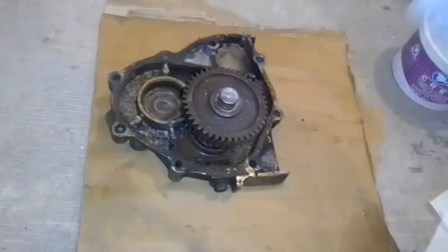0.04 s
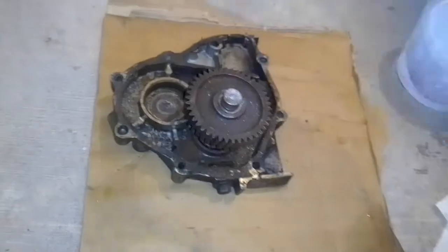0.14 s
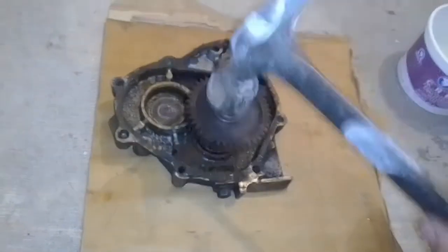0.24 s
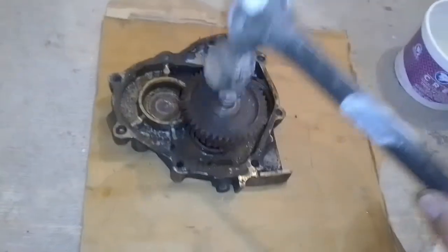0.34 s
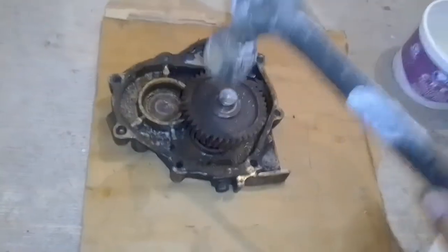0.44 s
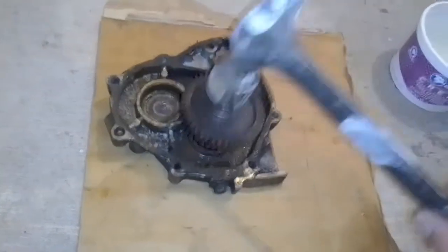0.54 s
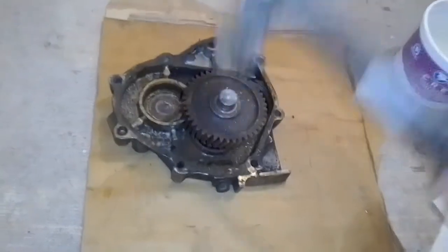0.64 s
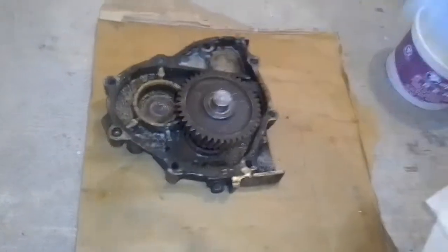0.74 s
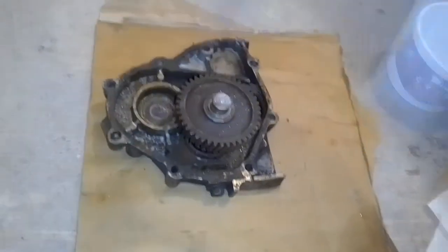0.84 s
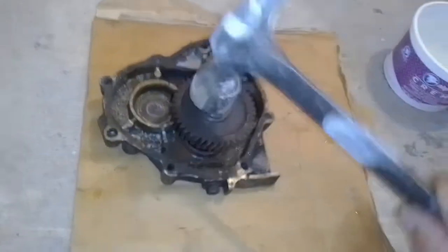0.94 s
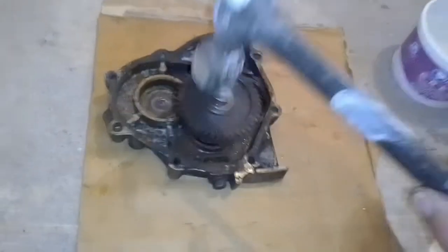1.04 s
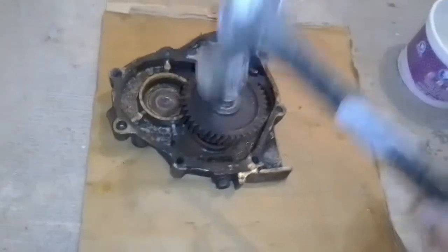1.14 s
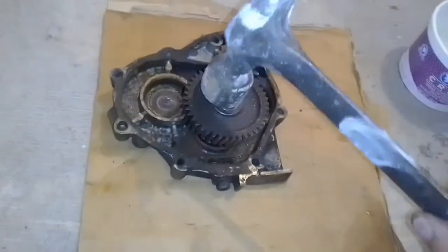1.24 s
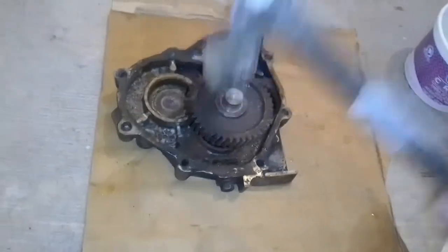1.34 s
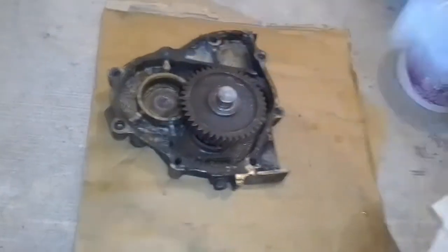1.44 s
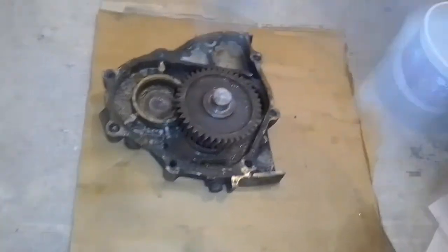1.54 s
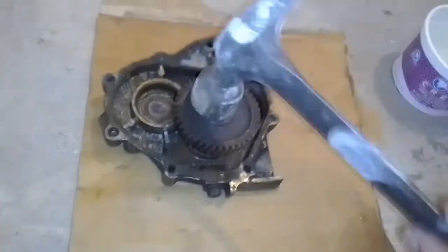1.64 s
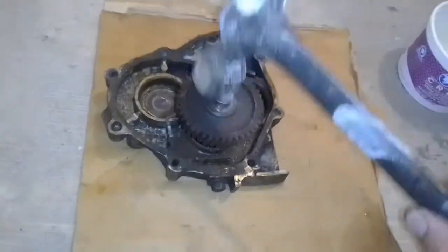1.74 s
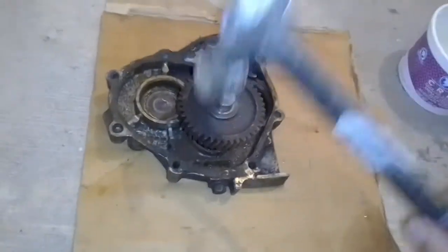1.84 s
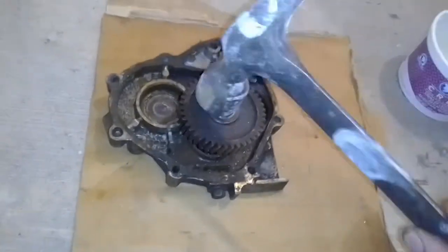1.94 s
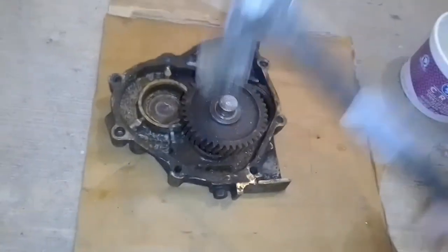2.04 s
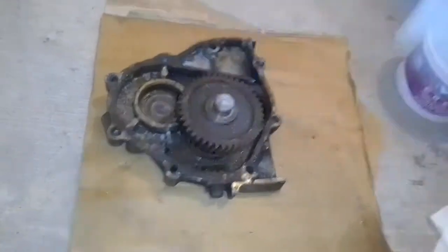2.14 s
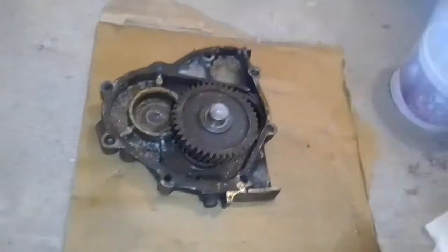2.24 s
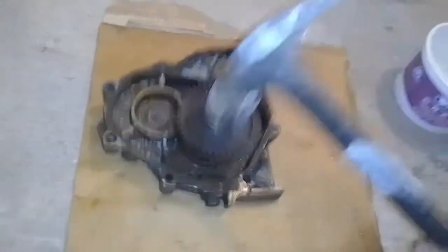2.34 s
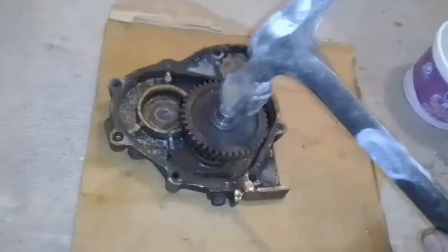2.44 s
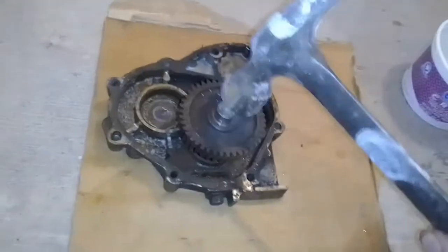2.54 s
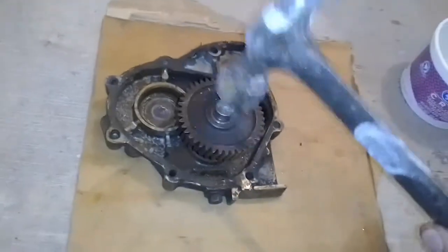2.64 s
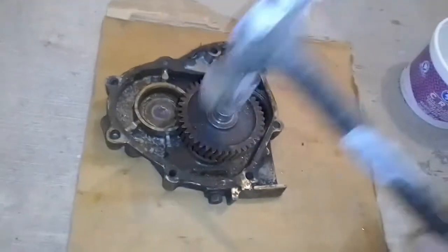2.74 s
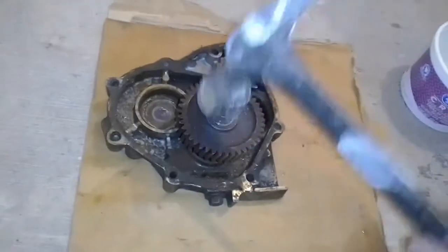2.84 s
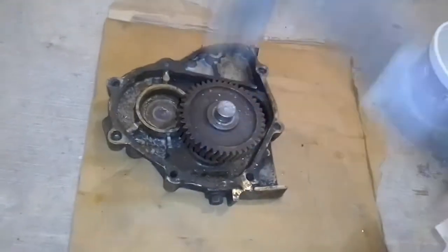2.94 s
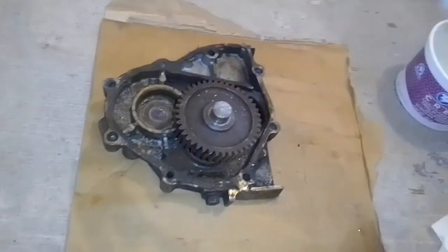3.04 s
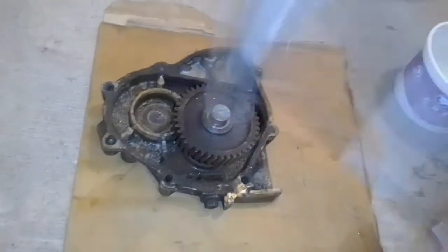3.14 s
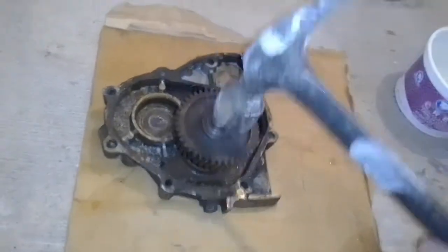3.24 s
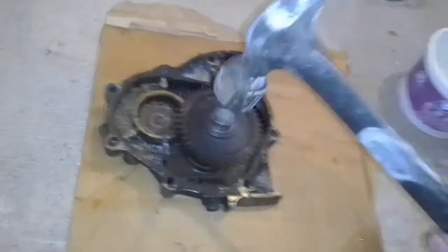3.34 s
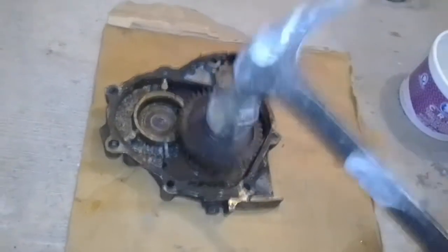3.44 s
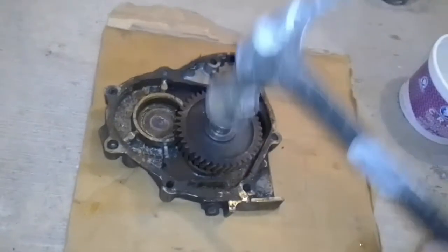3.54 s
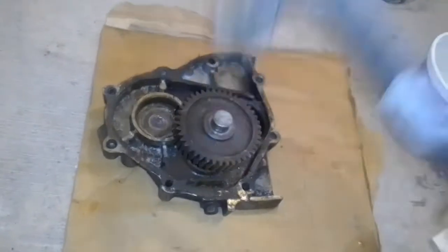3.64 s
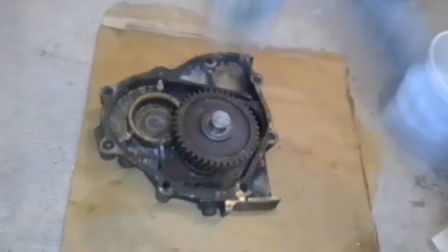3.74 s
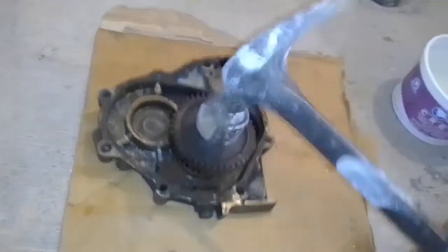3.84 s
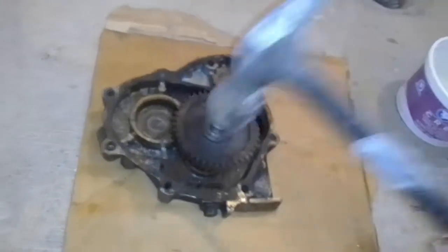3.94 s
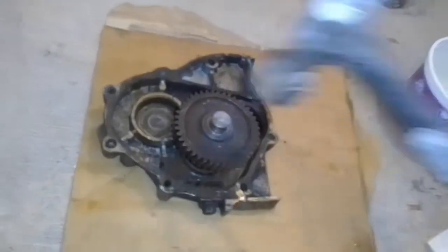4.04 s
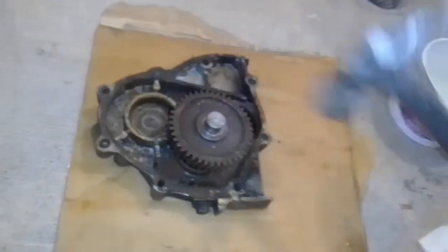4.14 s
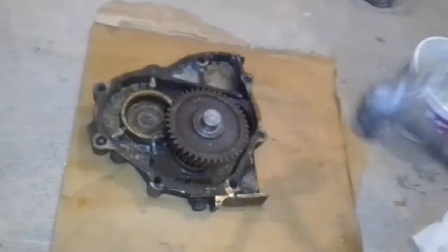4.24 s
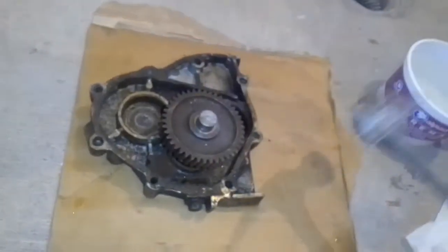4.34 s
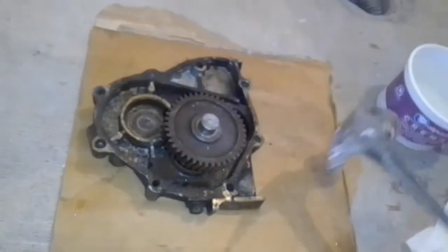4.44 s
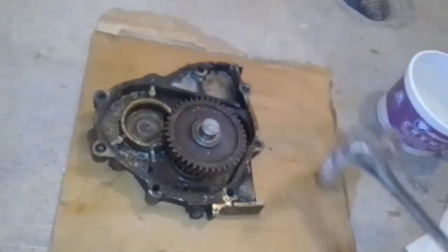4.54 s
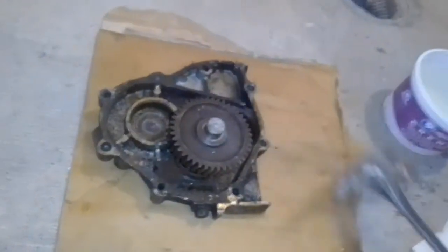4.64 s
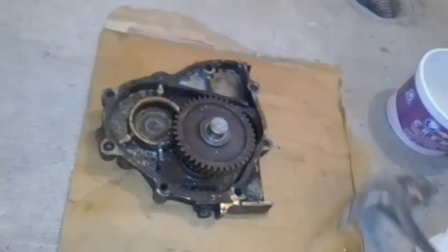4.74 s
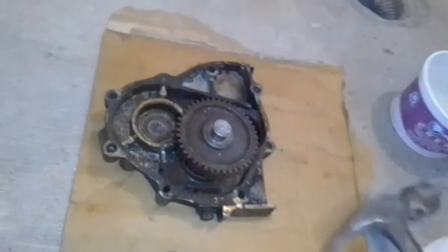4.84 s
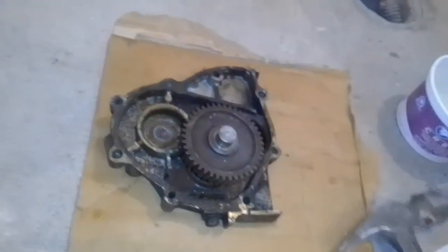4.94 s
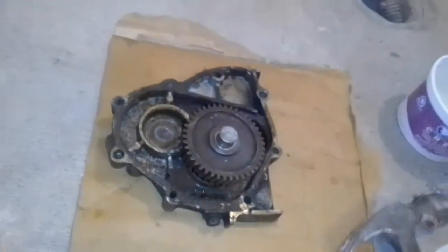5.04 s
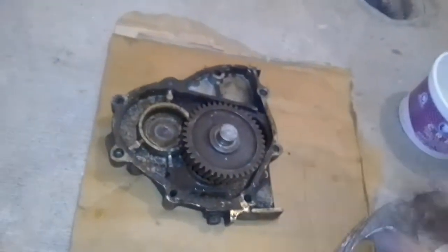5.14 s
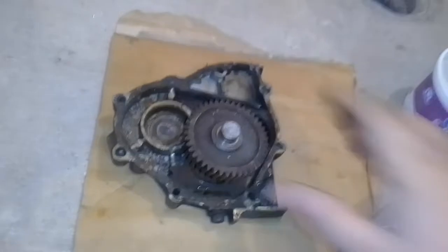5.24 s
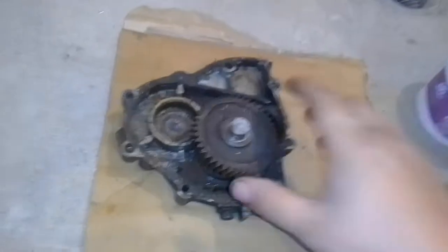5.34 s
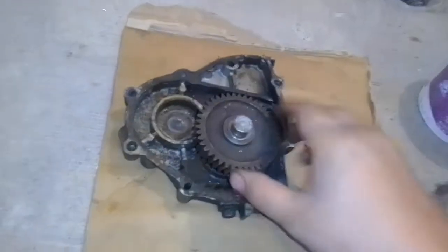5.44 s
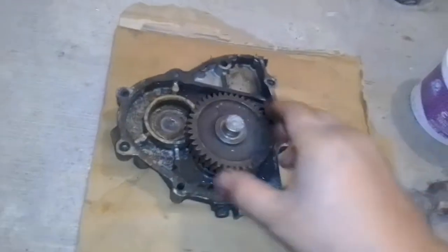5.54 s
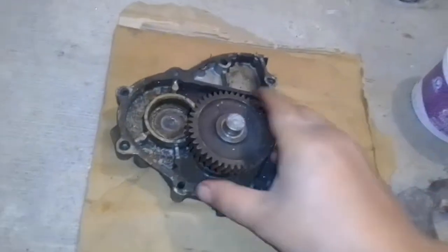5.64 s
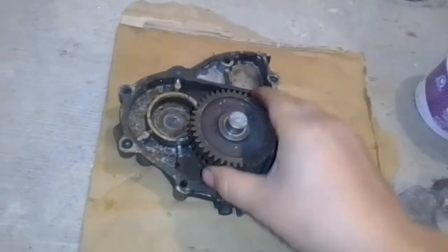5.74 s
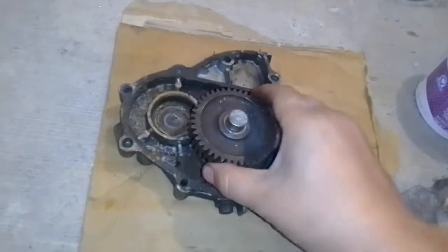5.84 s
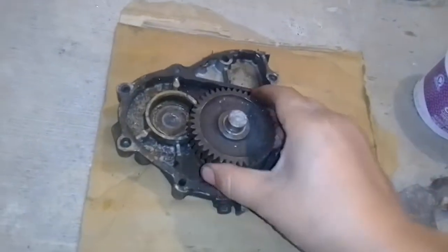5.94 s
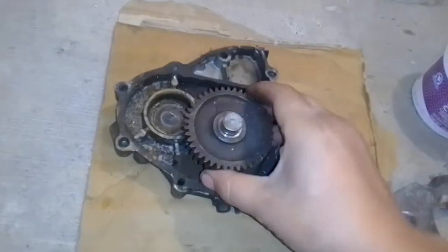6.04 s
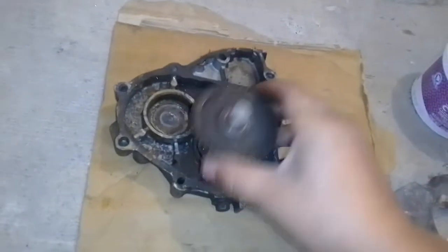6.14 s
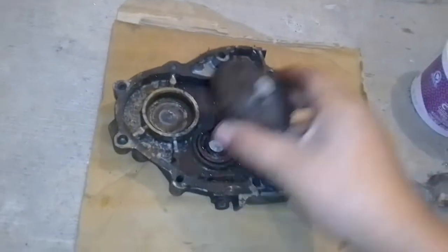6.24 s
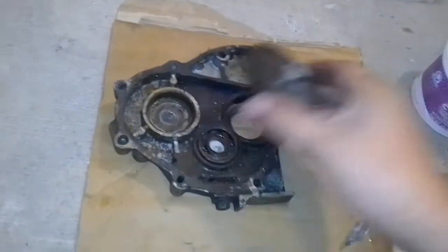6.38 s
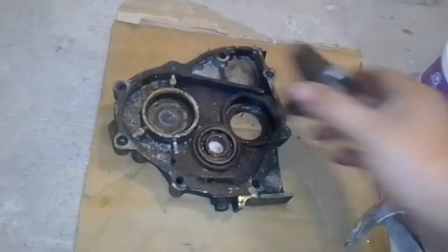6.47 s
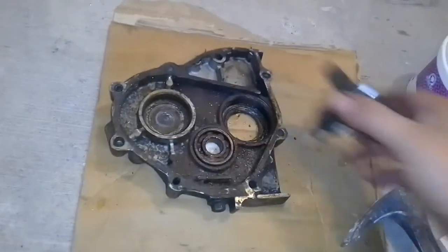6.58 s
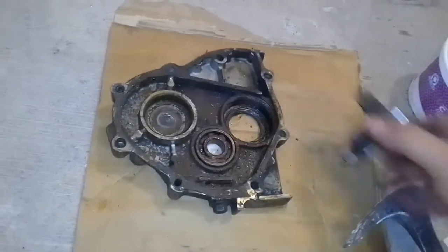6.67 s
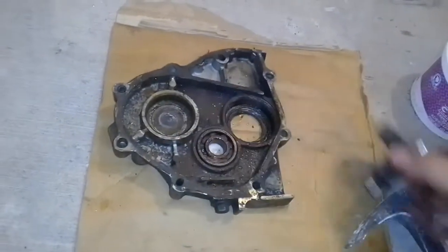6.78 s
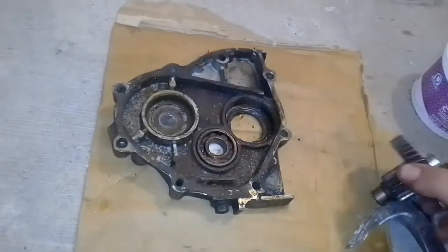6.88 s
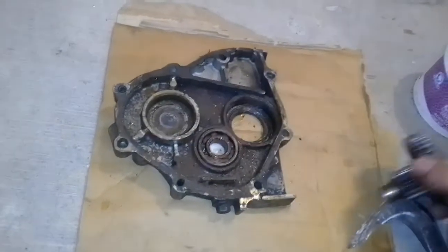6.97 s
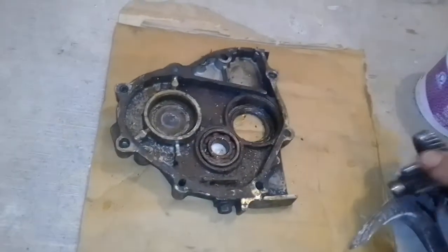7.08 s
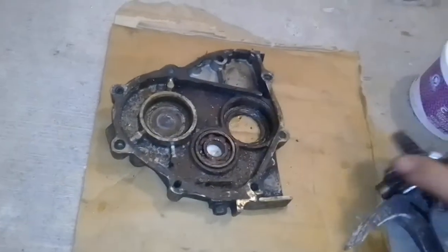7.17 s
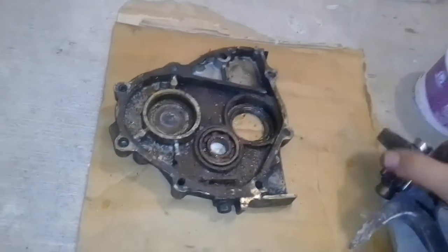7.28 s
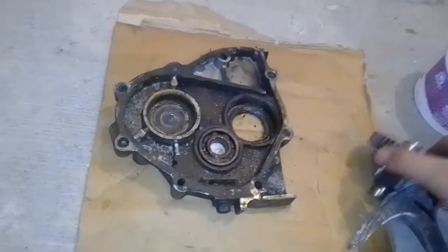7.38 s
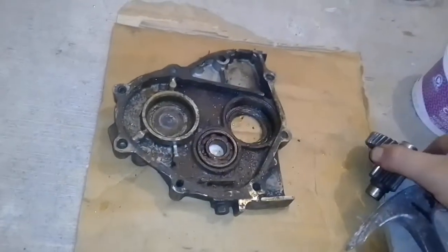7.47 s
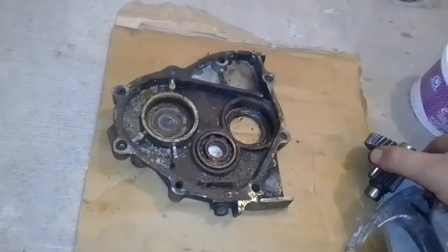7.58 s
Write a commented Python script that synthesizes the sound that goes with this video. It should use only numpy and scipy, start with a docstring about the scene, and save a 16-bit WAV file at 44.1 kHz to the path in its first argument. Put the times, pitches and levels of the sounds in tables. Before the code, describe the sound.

Loud metal-on-metal hammer blows with small taps between them, then a hammer knocks on the floor and a gear clinks quietly.

```python
"""Hammering out a gear shaft

A claw hammer drives a steel shaft out of an alloy gearbox cover lying on cardboard in a workshop.
Six heavy blows make the shaft shriek, the cover hop and the microphone overload; after five of them
the hammer drops back in a light tap. Then the hammer is laid on the floor, and the freed gear is
lifted out and set down with a soft scrape and a few clinks, over quiet air and a low hum."""
import sys
import numpy as np
from scipy import signal
from scipy.fft import rfft, irfft, next_fast_len
from scipy.io import wavfile
from scipy.ndimage import uniform_filter1d, minimum_filter1d

SR = 44100
rng = np.random.default_rng(int(sys.argv[2]) if len(sys.argv) > 2 else 0)


def transcribe(u):
    """Save the signal u as a 16-bit wav file named by the first command-line argument.

    u: samples, shape (n,) or (channels, n), limited to [-1, 1]; the rate is SR.
    q: integer samples, one column per channel.
    """
    v = np.clip(np.atleast_2d(u).T, -1, 1)
    q = np.round(v * 32767).astype(np.int16)
    wavfile.write(sys.argv[1], SR, q)


N = 335601


# Heavy blows: t/s, shaft ring/dB, cover ring/dB, landing delay/s, landing level/dB, rebound delay/s
HEAVY_BLOWS = [(0.241, 28, -23.5, 0.018, 1.5, 0.028), (0.9380, 25, -6.5, .011, 10.5, 0.031),
               (1.6432, 18, -6.5, .007, -2.5, 0.022), (2.37, 27, -2.5, .015, 7.5, 0.038),
               (3.1907, 23.5, 1.5, .014, 2.5, .024), (3.8263, 27, 1, .009, -3, .023)]
# The hammer drops back on the shaft: t/s, level/dB, shaft ring/dB
LIGHT_TAPS = [(0.5456, -7.5, -12.5), (1.2197, -6.5, -18), (1.9218, -4.5, -19.5), (2.7945, -6, -13.5),
              (3.4695, -6, -18.5)]

def hammering(tight_db=-10.5, loosening_s=0.4, late_click_s=0.062):
    """Heavy blows, each followed by a rebound of the shaft and a weaker late click; light taps between."""
    out = np.zeros(N)
    first_s = HEAVY_BLOWS[0][0]
    for s, shaft_db, cover_db, _, _, rebound_s in HEAVY_BLOWS:
        rattle_db = tight_db * np.exp((first_s - s) / loosening_s)  # rises as the shaft works loose
        add(out, s, strike(11, shaft_db, cover_db, head_db=1, chatter_db=rattle_db + 2, tilt_db=0))
        add(out, s + rebound_s, amp(rattle_db) * click_and_clang(cover_db))
        add(out, s + late_click_s, amp(rattle_db - 6.5) * click_and_clang(cover_db))
    for s, db, shaft_db in LIGHT_TAPS:
        tap = strike(db, shaft_db, cover_db=db - 24, head_db=db - 6.5, chatter_db=db - 19, tilt_db=-1.5)
        add(out, s, tap)
    return out


# Bright crack of steel on steel: f/Hz, level/dB
STEEL_EQ = [(30, -15), (140, -11), (220, -3.5), (480, -2), (750, -6.5), (1100, -7), (2000, 4.5),
            (2900, 2.5), (4300, 0.5), (6500, -5.5), (8500, -4.5), (10000, 10), (12000, -16.5), (16000, -33)]
# Shriek of the shaft, ping of the hammer head, clang of the cover: f/Hz, level/dB, t60/s
SHAFT_MODES = [(7865, -31, .18), (9390, -8, .055), (9455, -34, .42), (9462, 0, .075), (9508, -6, .08),
               (9680, -10, .022)]
HEAD_MODES = [(2270, -11, .06), (2630, -6, .04), (2880, 1, .025), (3820, -3, .025), (4320, -8, .05),
              (5030, 0, .07), (5033, -28, .35), (5656, -22, .25)]
COVER_MODES = [(437, -12, .1), (1015, -3, .05), (1085, 0, .05), (1140, 0, .06), (1205, -2, .06),
               (1250, -22, .5), (1310, -4, .06), (1850, -8, .04), (2700, -8, .04), (2830, -25, .4),
               (3060, -10, .07)]

def strike(crack_db, shaft_db, cover_db, head_db, chatter_db, tilt_db):
    """Steel cracks on steel and rattles; shaft, head and cover ring on, blurred by the room."""
    crack = amp(crack_db) * contact(STEEL_EQ, tilt_db, t60=0.025, scatter=1.7)
    rattle = amp(chatter_db) * chatter()
    ping = amp(head_db) * ring(HEAD_MODES)
    return (workshop(crack + rattle + ping, wet_db=-12.5)
            + workshop(amp(shaft_db) * ring(SHAFT_MODES), wet_db=-6)
            + workshop(amp(cover_db) * ring(COVER_MODES, detune=0.0072), wet_db=-12))


def click_and_clang(cover_db):
    """A short, bright click with a faint clang of the cover."""
    click = amp(2.5) * contact(STEEL_EQ, tilt_db=1.7, t60=0.014, scatter=1.6)
    clang = amp(cover_db - 5.5) * ring(COVER_MODES, detune=0.026)
    return workshop(click, wet_db=-17) + workshop(clang, wet_db=-10.5)


def chatter(count=10, span_s=0.085, fall_db_per_s=230):
    """The shaft rattles in its bearing: irregular small contacts that weaken quickly."""
    jitter, softness = rng.random((count, 2)).T
    s = span_s * (np.arange(count) + jitter) / count
    impulses = np.zeros(SR // 2)
    impulses[(s * SR).astype(int)] = amp(-fall_db_per_s * s - 10 * softness)
    tick = contact(STEEL_EQ, tilt_db=-0.3, t60=0.006, scatter=0.8)[:2048]
    return signal.fftconvolve(impulses, tick)[:SR // 2]


# Dull thud of the cover on cardboard: f/Hz, level/dB
CARDBOARD_EQ = [(30, -9.5), (100, -3), (150, -8), (240, 2), (500, 5), (1200, 8), (3000, 4), (7000, -16),
                (10000, -4.5), (12000, -15.5), (16000, -23.5)]
# The cover settles between blows: t/s, level/dB
COVER_SETTLES = [(0.424, -41.5), (1.42, -47.5), (2.117, -47), (2.916, -37), (3.376, -40), (3.676, -52)]

def hopping_cover():
    """The cover jumps under each blow and lands dully; later it settles with a darker thud."""
    out = np.zeros(N)
    landings = [(s + delay_s, db) for s, _, _, delay_s, db, _ in HEAVY_BLOWS]
    for hits, tilt_db in [(landings, -1), (COVER_SETTLES, -4)]:
        for s, db in hits:
            thud = contact(CARDBOARD_EQ, tilt_db, t60=0.03, scatter=1.8)
            add(out, s, amp(db) * workshop(thud, wet_db=-28))
            add(out, s, amp(db - 25) * thump())
    return out


def thump(hz=105, t60=0.05):
    """The cover's weight presses the cardboard against the floor: a low, quickly damped swing."""
    t = np.arange(SR // 4) / SR
    return decay(t, t60) * np.sin(2 * np.pi * hz * t)


# The hammer meets the floor: t/s, level/dB, tilt/(dB per octave), reverb/dB
FLOOR_KNOCKS = [(4.7467, -52, 4.5, 1), (4.8883, -30.5, 4, -7), (4.9010, -32, 4, 1), (4.941, -34, 1.5, -9),
                (5.08, -18, 2, 0), (5.1690, -23, 0.5, -2)]
# Dark body of a floor knock: f/Hz, level/dB
FLOOR_EQ = [(60, -10.5), (150, -15), (222, -6.5), (320, -4), (440, 7), (620, -9.5), (850, -3.5),
            (1300, -11), (1750, -9), (2450, -20), (4000, -36.5), (7500, -42), (10200, -27.5), (15000, -70)]
# Short ring of the handle: f/Hz, level/dB, t60/s
HANDLE_MODES = [(763, -4, 0.074), (961, 3, 0.089), (1292, 4, 0.036), (1480, -13, 0.052), (1733, -19, 0.03),
                (2130, -16, 0.023)]

def hammer_laid_down():
    """Head and handle knock on the floor, and the handle rings briefly."""
    out = np.zeros(N)
    for s, db, tilt_db, wet_db in FLOOR_KNOCKS:
        knock = contact(FLOOR_EQ, tilt_db, t60=0.014, scatter=5.7)
        handle = amp(-9) * ring(HANDLE_MODES, detune=0.028)
        add(out, s, workshop(amp(db) * (knock + handle), wet_db))
    return out


# The gear slips free and is set down: t/s, level/dB, tilt/(dB per octave), grip/(0-1)
GEAR_CLINKS = [(6.1298, -48, 19, 0.86), (6.8567, -27, 7.5, 0.1), (6.886, -31, 4, 0),
               (7.17, -40.5, -0.5, 0.92), (7.1983, -41, -4, 0.9), (7.2802, -34, -7, 0.9),
               (7.2992, -36, -2, .7), (7.43, -34, -1, 0), (7.4560, -41.5, 27, 0.75)]
# Attack of a clink: f/Hz, level/dB
CLINK_EQ = [(88, -66.5), (150, -60.5), (197, -30), (315, -32), (368, -6), (578, -20.5), (960, 1.5),
            (1170, -13.5), (1420, -7.5), (1630, -16), (2920, -20), (4580, -21.5), (6640, -35), (9820, -35),
            (16000, -78)]
# Chime of the gear: f/Hz, level/dB, t60/s
GEAR_MODES = [(919, 4, 0.17), (1000, -0.5, 0.32), (1930, -7, 0.1), (3800, -15, 0.093), (4060, -16, 0.088),
              (5100, -5.5, 0.045), (7500, -17, 0.1), (7560, -4, 0.15), (9900, 5, 0.098)]

def clinking_gear(full_grip_db=-20):
    """The gear clinks; the firmer the hand holds it, the quieter it rings."""
    out = np.zeros(N)
    for s, db, tilt_db, grip in GEAR_CLINKS:
        clink = contact(CLINK_EQ, tilt_db, t60=0.042, scatter=4.7)
        chime = amp(-16 + full_grip_db * grip) * ring(GEAR_MODES, detune=0.0111)
        add(out, s, workshop(amp(db) * (clink + chime), wet_db=-7))
    return out


# Muffled scrape on cardboard: f/Hz, level/dB
SCRAPE_EQ = [(100, 1), (250, -7), (420, 4), (600, -4), (950, 3.5), (1500, -7), (4000, -27.5), (16000, -33)]

def dragging_gear(grain=0.24):
    """The gear's teeth scrape softly over the cardboard."""
    roughness = np.exp(grain * wander(300))
    envelope = stroke(start_s=6.83, end_s=7.6, attack_s=0.48, release_s=0.12)
    return amp(-55.5) * envelope * unit_rms(roughness * noise(SCRAPE_EQ))


# Thin, high hiss of the fingers: f/Hz, level/dB
SKIN_EQ = [(2000, -16), (5000, -13), (8000, -4), (10200, 3), (12500, -7), (16000, -14)]

def fingers():
    """Skin slides over metal with a faint hiss."""
    envelope = stroke(start_s=5.75, end_s=6.86, attack_s=0.96, release_s=0.2)
    return amp(-71.5) * envelope * noise(SKIN_EQ)


# Reverb time of the workshop: f/Hz, t60/s
ROOM_DECAY = [(200, 0.51), (530, .4), (1400, 0.41), (3700, 0.36), (9700, 0.28), (15000, 0.24)]

def workshop(sound, wet_db, build_s=0.0023):
    """Direct sound plus dense reflections that build up quickly, each band dying at its own speed."""
    hz, t, bands = signal.stft(rng.standard_normal(SR // 2), SR, nperseg=256)
    tail = signal.istft(bands * decay(t, curve(ROOM_DECAY, hz)[:, None]), SR)[1]
    tail *= 1 - np.exp(-np.arange(len(tail)) / SR / build_s)
    response = amp(wet_db) * tail / np.linalg.norm(tail)
    response[0] += 1
    return signal.fftconvolve(sound, response)


# Low hum, ahead of its waver and swell: f/Hz, level/dB
HUM_TONES = [(65, -64.5)]
# Bass-heavy bed of air: f/Hz, level/dB
AIR_EQ = [(25, -7), (64, 0.5), (108, 0.5), (149, -15.5), (212, -12.5), (263, -21), (503, -17), (800, -16),
          (1370, -18), (3340, -32), (7920, -38.5), (10100, -26), (12000, -39), (16000, -45.5)]

def room_tone():
    """Quiet air and a low, wavering hum that swells once the hammering is over."""
    t = np.arange(N) / SR
    hum = sum(amp(db) * np.sqrt(2) * np.sin(2 * np.pi * hz * t) for hz, db in HUM_TONES)
    waver = 1 + 0.49 * wander(4000)
    swell = np.interp(t, [4.2, 4.9], [0.3, 0.9])
    return amp(-61.5) * noise(AIR_EQ) + hum * waver * swell


def contact(eq, tilt_db, t60, scatter, size=4096):
    """A sharp push and a short scatter of noise, coloured by eq and tilted by tilt_db per octave."""
    hz = abs(np.fft.fftfreq(size, 1 / SR))
    octaves = np.log2(np.maximum(hz, 200) / 1000)
    body = minimum_phase(curve(eq, hz) + tilt_db * octaves)
    burst = rng.standard_normal(size) * decay(np.arange(size) / SR, t60)
    burst *= scatter / np.linalg.norm(burst)
    burst[0] += 1  # the push
    sound = np.pad(signal.fftconvolve(burst, body), (0, SR // 2))[:SR // 2]
    return sound / np.linalg.norm(sound) * np.sqrt(0.005 * SR)  # the energy of 5 ms at rms 1


def ring(modes, detune=0.0023, spread_db=2.0):
    """Dying sines; every strike shares its energy differently, and a loose part shifts in pitch."""
    t = np.arange(SR // 2) / SR
    shares = amp(spread_db * rng.standard_normal(len(modes))) * rng.choice([-1, 1], len(modes))
    shifts = 1 + detune * rng.uniform(-0.73, 1, len(modes))
    return sum(share * amp(db) * decay(t, t60) * np.sin(2 * np.pi * hz * shift * t)
               for share, shift, (hz, db, t60) in zip(shares, shifts, modes))


def stroke(start_s, end_s, attack_s, release_s):
    """Envelope of one hand movement: it swells and lets go."""
    t = np.arange(N) / SR
    return np.clip(np.minimum((t - start_s) / attack_s, (end_s - t) / release_s), 0, 1)


def noise(eq):
    """Steady coloured noise, rms 1."""
    size = next_fast_len(N, True)
    gain = amp(curve(eq, np.fft.rfftfreq(size, 1 / SR)))
    return unit_rms(irfft(rfft(rng.standard_normal(size)) * gain, size)[:N])


def wander(samples):
    """Random drift smoothed over so many samples, rms 1."""
    return unit_rms(uniform_filter1d(rng.standard_normal(N), samples))


def minimum_phase(gain_db):
    """Impulse response without pre-ringing, from a two-sided spectrum."""
    log_spectrum = np.conj(signal.hilbert(np.log(amp(gain_db))))
    response = np.fft.ifft(np.exp(log_spectrum)).real
    return response[:len(response) // 2]


def curve(points, hz):
    """Joins breakpoints by straight lines on a log-frequency axis."""
    f, value = np.transpose(points)
    return np.interp(np.log(hz + 1), np.log(f + 1), value)


def decay(t, t60):
    """Envelope that falls 60 dB in t60 seconds."""
    return np.exp(-np.log(1000) * t / t60)


def amp(db):
    """Decibels to amplitude."""
    return 10 ** (np.asarray(db) / 20)


def unit_rms(x):
    """Scales to rms 1."""
    return x / np.sqrt(np.mean(x ** 2) + 1e-20)


def add(mix, s, sound):
    """Mixes a sound in at s seconds."""
    part = mix[round(s * SR):][:len(sound)]
    part += sound[:len(part)]


def scene():
    """Everything heard at the microphone, in mono."""
    impacts = hammering() + hopping_cover() + hammer_laid_down() + clinking_gear()
    return (impacts + dragging_gear() + fingers() + room_tone())[None]


def overload(x, ceiling_db):
    """The preamplifier saturates: a loud ring is flattened and crowds out everything else."""
    ceiling = amp(ceiling_db)
    oversampled = signal.resample_poly(x, 4, 1)
    return signal.resample_poly(ceiling * np.tanh(oversampled / ceiling), 1, 4)


def gain_control(x, threshold_db, slope, recovery_db_per_s, look_ahead_s=0.037, first_step_db=10):
    """Gain that steps down just ahead of a loud sound, ducks fully on it and climbs back steadily."""
    level_db = 10 * np.log10(abs(uniform_filter1d(x ** 2, size=400)) + 1e-12)
    cut_db = slope * np.maximum(level_db - threshold_db, 0)
    half = int(look_ahead_s * SR / 2)
    coming_db = -minimum_filter1d(-cut_db, 2 * half + 1, origin=-half)
    cut_db = np.maximum(cut_db, np.minimum(coming_db, first_step_db))
    climb_db = np.arange(N) / SR * recovery_db_per_s
    held_db = np.maximum.accumulate(cut_db + climb_db) - climb_db
    return amp(-uniform_filter1d(held_db, size=200))


# Low cut that thins the bass: f/Hz, level/dB
LOW_CUT_EQ = [(25, -15.5), (100, -10.5), (155, -21.5), (215, -1), (300, -1.5)]

def record(dry, top_hz=15900):
    """The blows overload and duck the signal; then the bass is thinned and the top cut off."""
    gain = gain_control(dry[0], threshold_db=-21, slope=0.46, recovery_db_per_s=195)
    squashed = gain * overload(dry[0], ceiling_db=5.5)
    low_cut = minimum_phase(curve(LOW_CUT_EQ, abs(np.fft.fftfreq(8192, 1 / SR))))
    high_cut = signal.firwin(401, top_hz, window=("kaiser", 8), fs=SR)
    thinned = signal.oaconvolve(squashed, low_cut)[:N]
    return signal.oaconvolve(thinned, high_cut, "same")[None]


dry = scene()
out = record(dry)
transcribe(out)
```